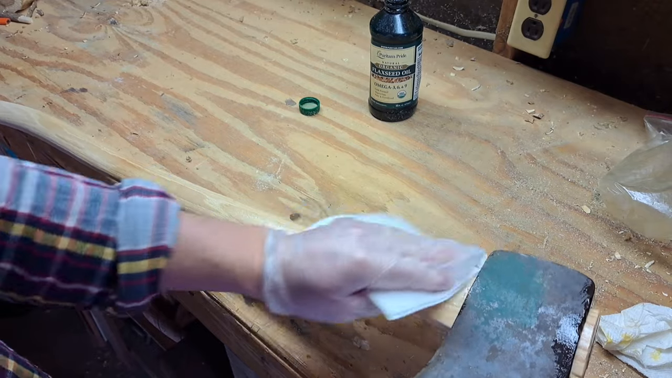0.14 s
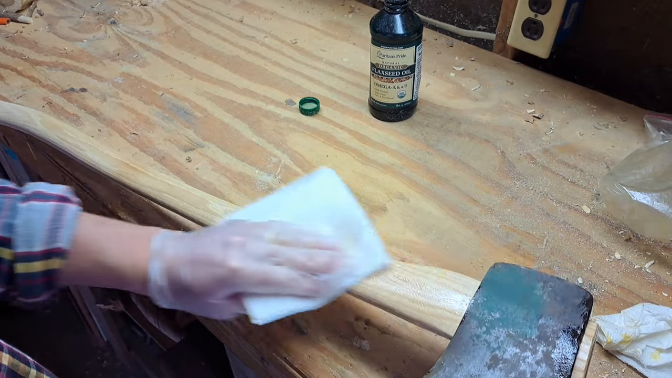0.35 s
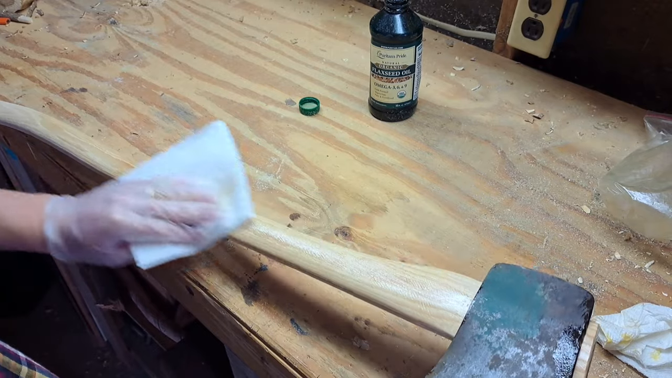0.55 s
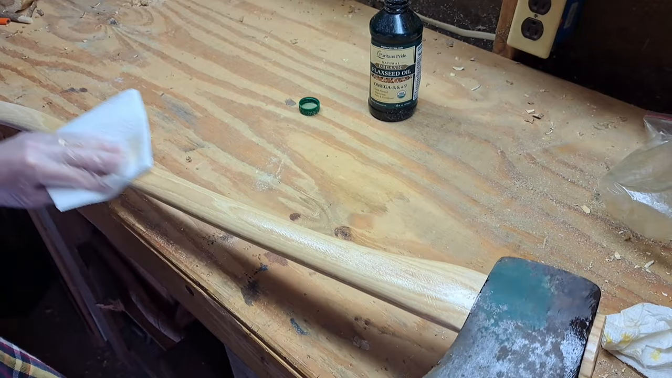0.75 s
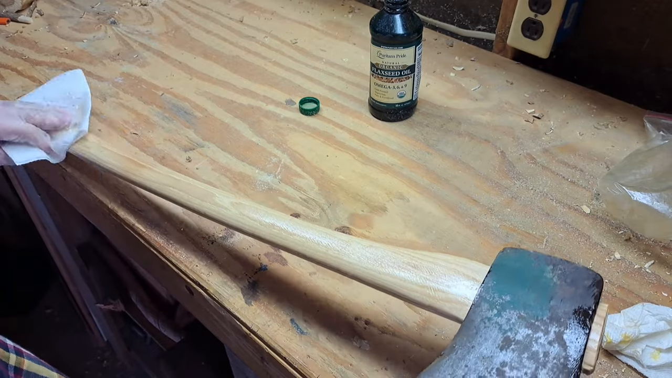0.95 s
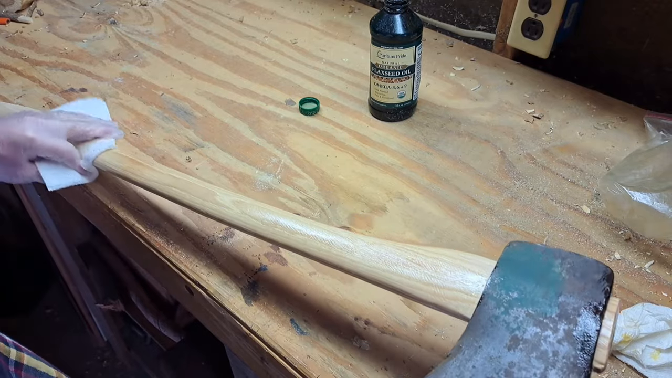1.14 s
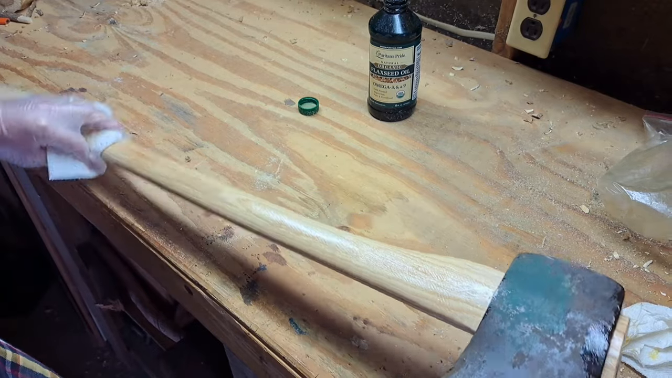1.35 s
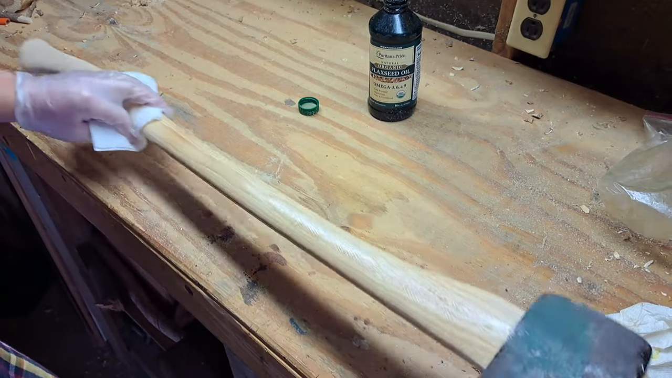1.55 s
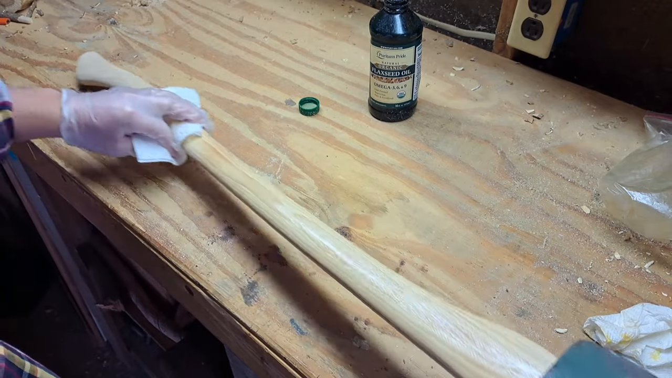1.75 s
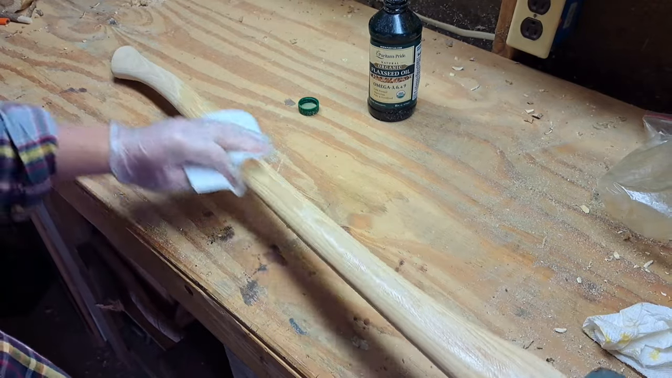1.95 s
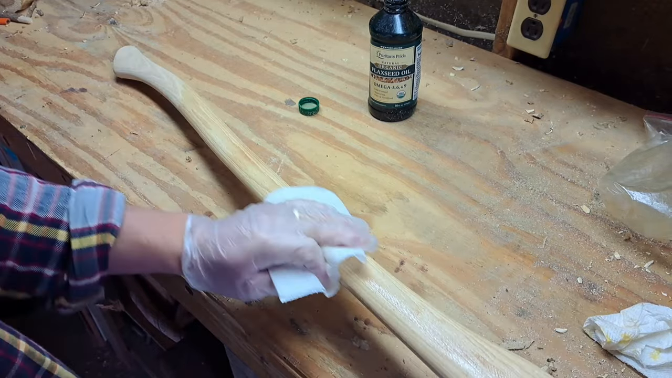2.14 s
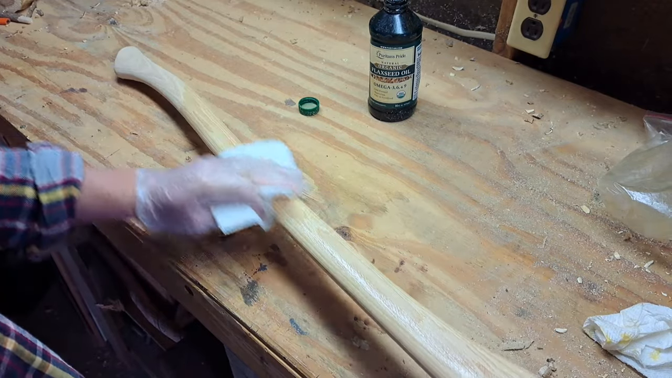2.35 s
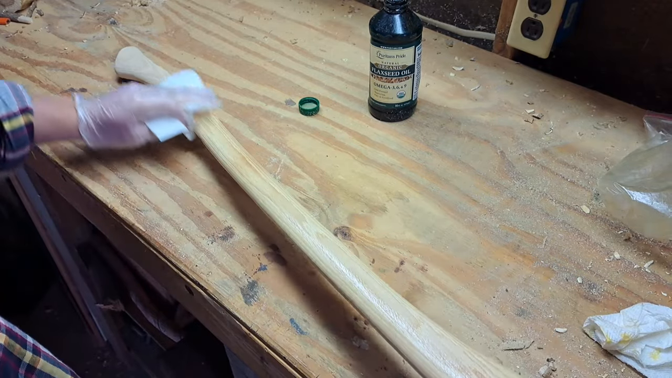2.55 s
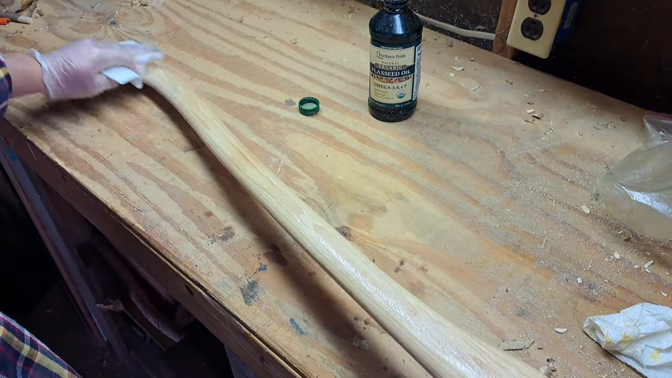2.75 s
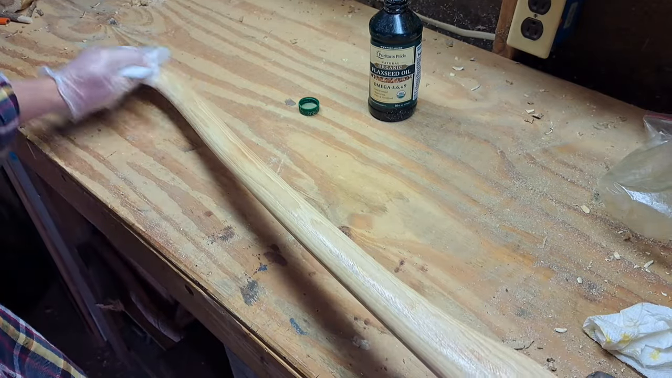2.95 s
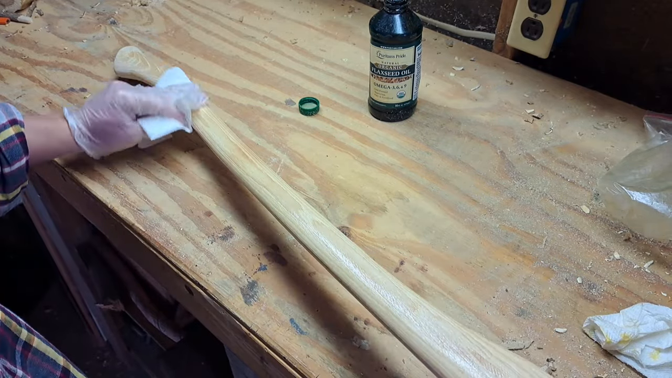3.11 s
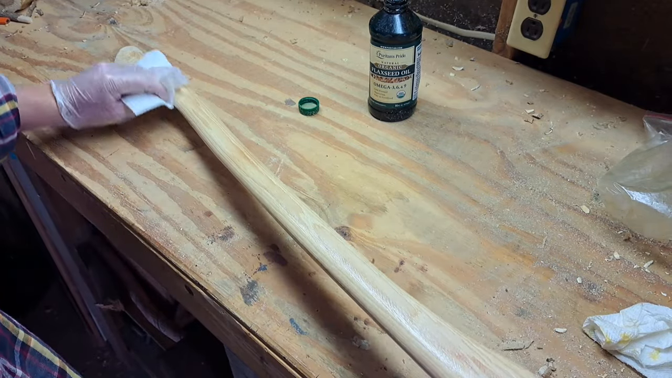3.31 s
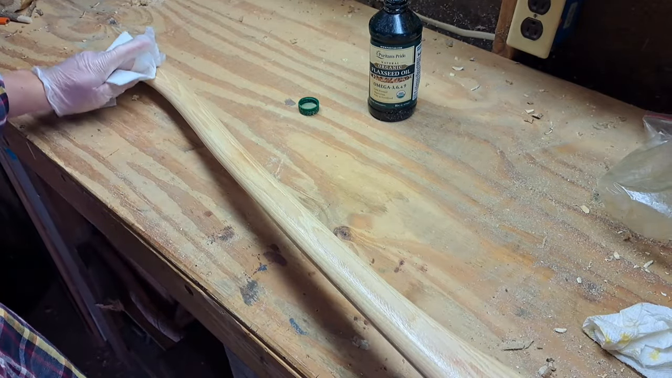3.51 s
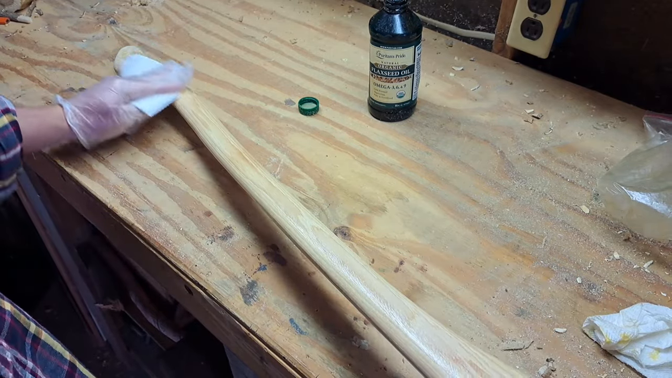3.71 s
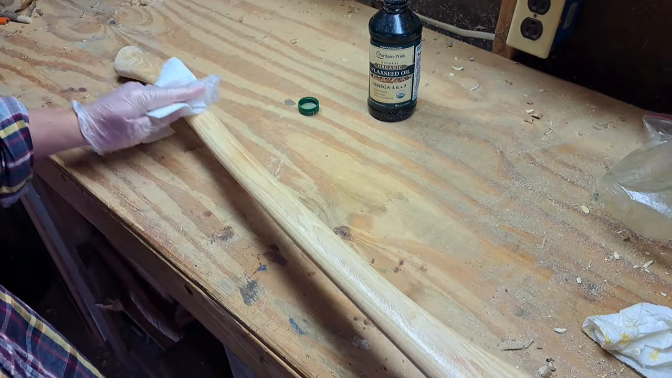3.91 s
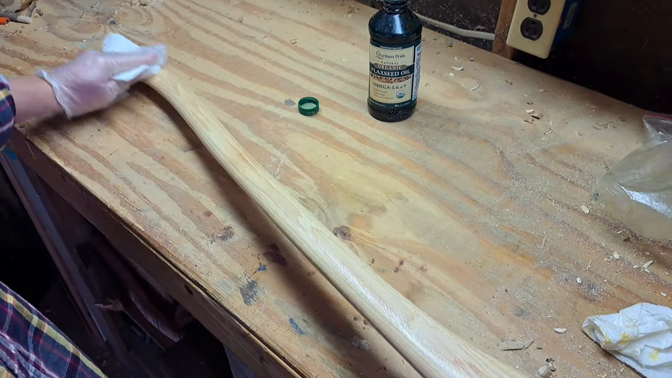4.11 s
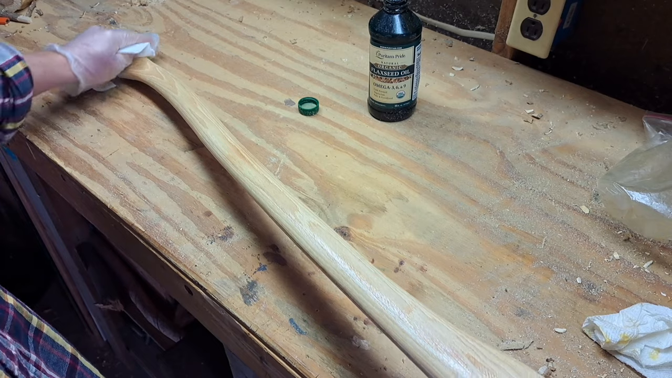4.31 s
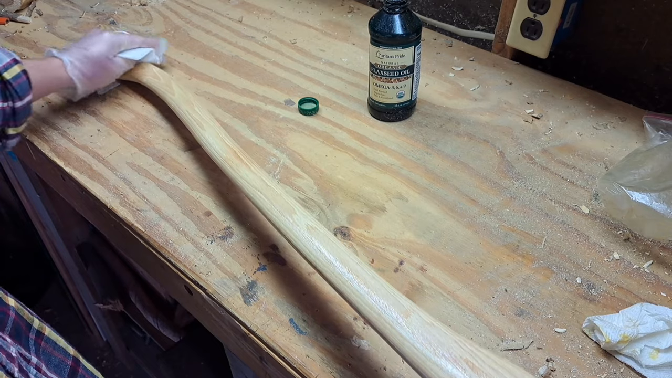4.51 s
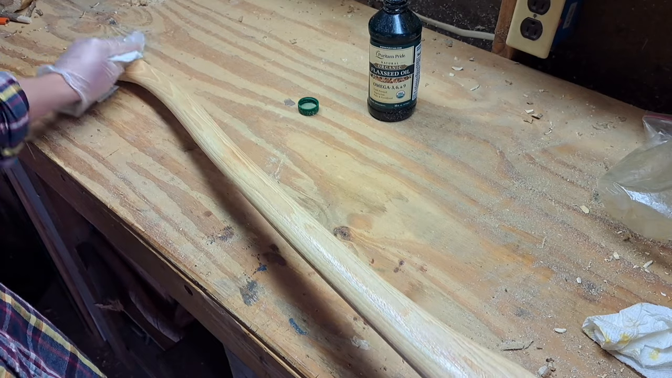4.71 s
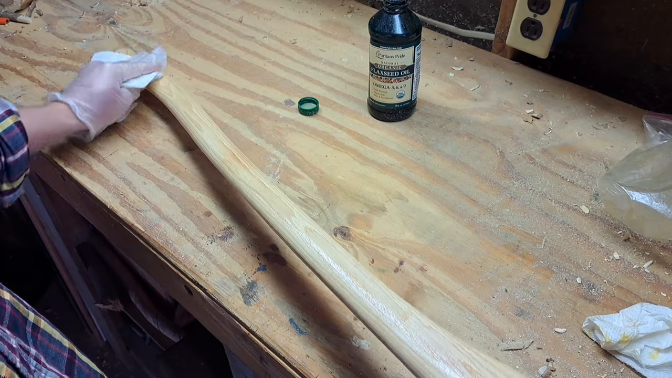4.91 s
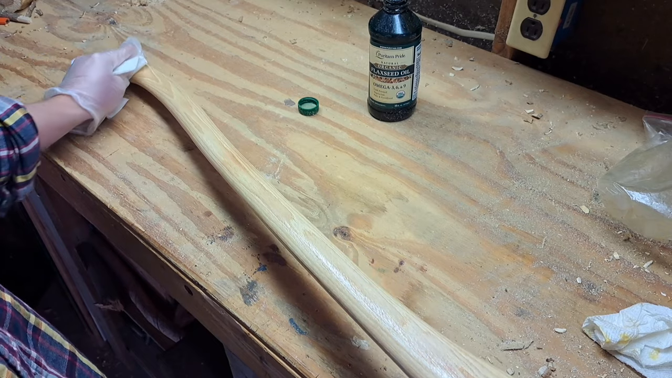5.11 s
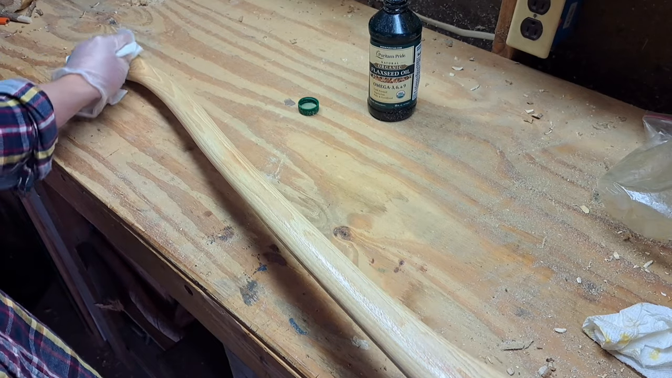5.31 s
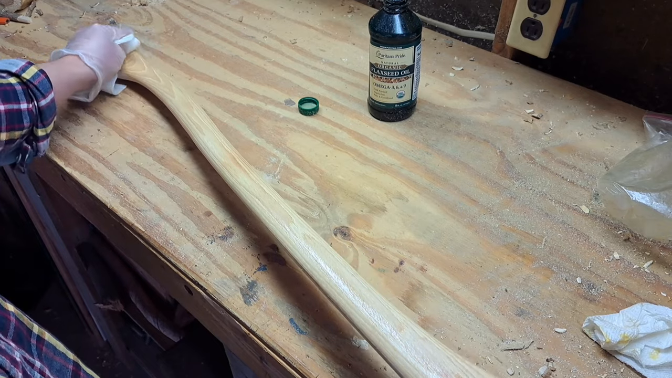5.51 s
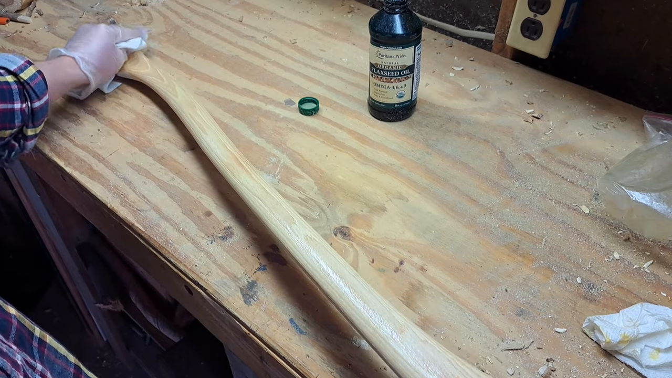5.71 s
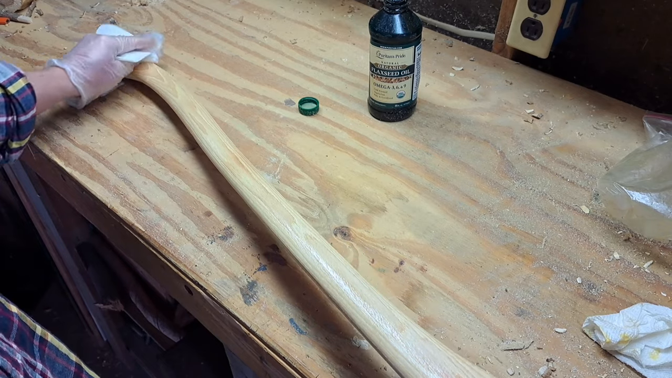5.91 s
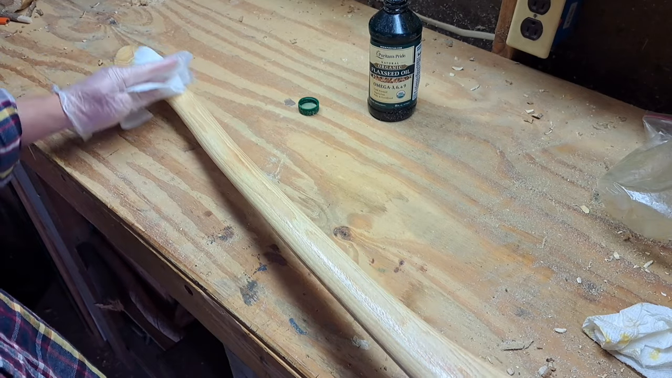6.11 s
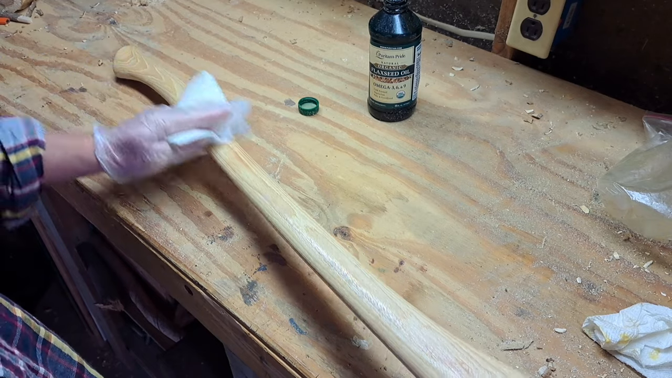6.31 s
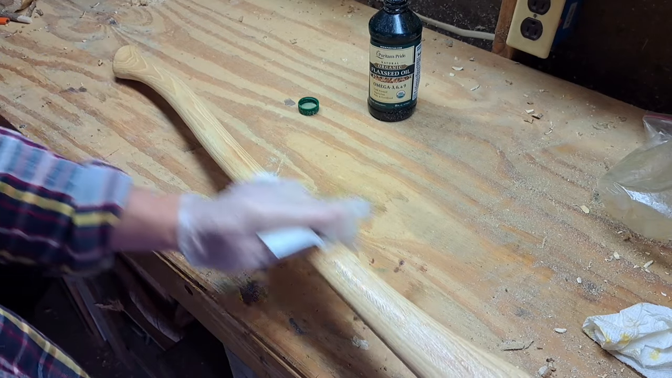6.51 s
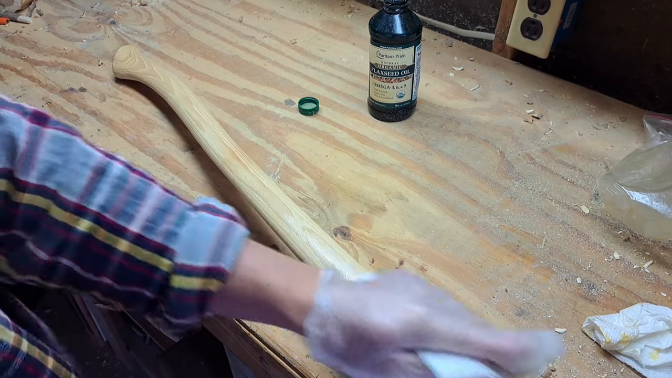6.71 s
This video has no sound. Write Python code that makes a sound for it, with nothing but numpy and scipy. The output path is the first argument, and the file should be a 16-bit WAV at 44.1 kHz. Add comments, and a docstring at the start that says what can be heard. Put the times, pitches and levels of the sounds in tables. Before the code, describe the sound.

A small, quiet workshop with a faint low room tone and a short reverberation, heard close in stereo. At 0 to 0.2 s dull soft knocks and a woody, humming drag shake the bench as a paper towel starts moving. A dry, bright papery swish runs from about 0.2 to 1.0 s, followed by a brief rub. At 1.3 s a hard little crack and gritty scrape sound as the axe head lifts, then near quiet. At 1.76 s the axe lands with a loud, low rattling thud, bouncing until about 2 s. Brisk rustling strokes follow, broad and hissy from 2.2 to 4.2 s, with a thin squeak near 3.07 s and fainter ones near 4.05 and 5.08 s. From 4.2 to 5.7 s rubs are shorter and softer, with low handle groans and a small bump at 4.6 s. Fuller swishes return from 5.8 s, the last still going at the end.

```python
"""Wiping oil along an axe handle

A gloved hand wipes oil along the wooden handle of an axe with a paper towel, on a plywood workbench in a small shop.
The paper is filtered noise and tiny random ticks that follow the hand's speed; it drags on the grain and the handle hums.
The axe rocks on the bench, its head scrapes as it is lifted, and it is set down again with a rattling thud:
these ring a shared set of bench modes. Short gliding tones make the oiled wood squeak, over quiet room noise."""
import sys
import numpy as np
from scipy import signal
from scipy.fft import rfft, irfft, next_fast_len
from scipy.io import wavfile
from scipy.ndimage import uniform_filter1d

SR = 44100
rng = np.random.default_rng(int(sys.argv[2]) if len(sys.argv) > 2 else 0)


def master(y):
    """Save y as 16-bit WAV."""
    cut = np.clip(np.atleast_2d(y).T, -1, 1)
    pcm = np.round(cut * 32767)  # scale
    wavfile.write(sys.argv[1], SR, pcm.astype(np.int16))


N = 297675
T = np.arange(N) / SR

# strokes of the towel; they overlap where the hand changes its grip on the way:
# (start_s, length_s, fastest_at as a share of the length, swell: low is even and high is peaked,
#  fibre_hiss_db, fold_rustle_db, pad_rub_db, grain_drag_db)
STROKES = [ (-.04, 0.15, 0.49, 0.84, -52.5, -51, -59, -46),
           (0.106, 0.18, 0.39, 0.66, -54, -53, -57.5, -56.5),
           (0.195, 0.24, 0.26, 0.25, -55, -60.5, -72, -77), (0.359, 0.65, 0.8, 0.32, -53, -59, -72.5, -84),
           (0.497, 0.17, 0.35, 0.65, -59, -77, -70, -74), (1.024, 0.19, 0.85, 0.49, -51, -53, -65.5, -87),
           (1.19, 0.27, 0.091, 0.66, -69, -66.5, -69, -89), (1.314, 0.046, .7, 1.2, -56.5, -55, -72, -78),
           (1.756, 0.18, 0.28, 0.61, -63, -52.5, -51, -75),
           (1.794, 0.44, 0.63, 0.67, -50, -53.5, -63, -65.5),
           (1.876, 0.098, 0.73, 0.81, -62, -69, -52.5, -49),
           (2.227, 0.37, 0.66, 0.34, -49.5, -55, -60.5, -74), (2.478, 0.22, 0.51, 0.55, -54, -70, -57, -51),
           (2.556, 0.29, 0.54, 0.84, -48, -53, -55, -55), (2.871, 0.33, 0.42, 0.85, -48.5, -55, -59, -60.5),
           (3.161, 0.42, 0.62, 0.59, -53.5, -58, -65, -68.5),
           (3.295, 0.14, 0.5, 0.81, -69, -69, -60, -62.5), (3.468, 0.11, 0.3, 0.88, -58, -62, -69, -57),
           (3.577, 0.32, 0.44, 0.6, -52, -56.5, -61.5, -65), (3.895, 0.15, 0.7, 0.35, -55.5, -62, -79, -80),
           (3.968, 0.37, 0.35, 0.93, -49, -53.5, -59.5, -62.5),
           (4.219, 0.26, 0.35, 0.43, -59, -61, -62.5, -62.5),
           (4.405, 0.19, 0.26, 0.55, -59, -58, -59.5, -62),
           (4.547, 0.16, 0.5, 0.32, -58, -57.5, -60.5, -66),
           (4.702, 0.26, 0.39, 0.25, -54.5, -59.5, -64.5, -73),
           (4.97, 0.19, 0.35, 0.7, -55, -59, -63.5, -83), (5.09, 0.53, 0.41, 0.42, -63, -61, -68.5, -76.5),
           (5.585, 0.14, 0.48, 0.74, -72, -65.5, -63, -68.5),
           (5.657, 0.16, 0.62, 0.2, -72, -72, -74.5, -79),
           (5.795, 0.37, 0.28, 0.37, -54.5, -56.5, -63.5, -68),
           (6.001, 0.36, 0.5, 0.51, -52.5, -63, -68, -68),
           (6.27, 0.91, 0.27, 0.45, -49.5, -53.5, -60.5, -69.5)]
# where the hand is: (time_s, reach: 0 at the head to 1 at the knob)
HAND_REACH = [(0, 0.092), (.3, 0.081), (.75, 0.67), (1.05, 1), (1.75, 0.98), (2.25, 0.36), (2.85, 0.97),
              (3.25, 0.7), (3.55, 1), (3.9, 0.9), (4.3, 0.94), (6, 0.94), (6.75, 0.18)]
# spectrum of a hard, gritty contact: (frequency_hz, level_db)
CRACK_SPECTRUM = [(300, -22), (700, 5), (1300, 4), (2200, -10.5), (5500, -11.5), (9000, -25), (15000, -29)]
GRIP_SHIFT = .08  # how far a new grip moves the resonances, on a natural-log scale


def undb(db):
    """Turn decibels into gain."""
    return 10 ** (np.asarray(db) / 20)


def unit(x):
    """Scale a sound to an rms of 1."""
    return x / np.sqrt(np.mean(x ** 2))


def curves(rows):
    """Read each column of a time table at every sample."""
    seconds, *columns = np.transpose(rows)
    return [np.interp(T, seconds, column) for column in columns]


def shape(x, gain):
    """Filter a sound by a gain that is a function of frequency."""
    size = next_fast_len(x.shape[-1] + 8192)
    hz = np.maximum(np.arange(size // 2 + 1) * SR / size, 1)
    return irfft(rfft(x, size) * gain(hz), size)[..., :x.shape[-1]]


def along(points, hz):
    """Read (frequency_hz, value) points on a logarithmic frequency axis."""
    point_hz, value = np.transpose(points)
    return np.interp(np.log(hz), np.log(point_hz), value)


def colour(x, points):
    """Filter a sound by (frequency_hz, level_db) points."""
    return shape(x, lambda hz: undb(along(points, hz)))


def ports(pair):
    """Mix two unrelated signals into left and right microphone ports: alike in the bass, unrelated in the treble."""
    # how alike the ports are: (frequency_hz, likeness 0-1)
    port_likeness = [(100, 0.86), (300, 0.92), (640, 0.65), (1400, 0.3), (3000, 0.13), (15000, 0.13)]
    mid = shape(pair[0], lambda hz: np.sqrt(1 + np.clip(along(port_likeness, hz), 0, .99)))
    side = shape(pair[1], lambda hz: np.sqrt(1 - np.clip(along(port_likeness, hz), 0, .99)))
    return np.array([mid + side, mid - side])


def noise(size=N):
    """Make white noise at the two ports."""
    return ports(rng.standard_normal((2, size)))


def walk(rate):
    """Random levels, rate of them per second, joined by slopes; spread near 1."""
    hold = max(int(SR / rate), 1)
    steps = np.repeat(rng.standard_normal(N // hold + 1), hold)
    return unit(uniform_filter1d(steps, hold)[:N])


def ring(x, response):
    """Pass a sound through a left and right impulse response."""
    return signal.fftconvolve(np.atleast_2d(x), response, axes=-1)[:, :N]


def fade(t, t60):
    """Die away exponentially, by 60 dB in t60 seconds."""
    return np.exp(-np.log(1000) * t / t60)


def resonance(x, hz, width_hz):
    """Ring a resonance whose centre may glide; a larger width is broader."""
    turn = np.exp(2j * np.pi * np.cumsum(hz * np.ones(N)) / SR)
    pole = np.exp(-2 * np.pi * width_hz / SR)
    # shift the centre down to 0 Hz, filter there, and shift back
    rung = signal.lfilter([1], [1, -2 * pole, pole ** 2], x / turn) * turn
    return unit(rung.real)


def slips(rate, spread_db):
    """Make tiny random slips, about rate per second: many weak, a few strong."""
    size = undb(spread_db * np.minimum(rng.exponential(size=N), 5))
    return (rng.random(N) < rate / SR) * size * rng.choice([-1, 1], N)


def friction(spectrum, rate, spread_db, smooth, flutter_db):
    """Catching fibres tick over a smooth rush; the contact flutters as the paper shifts."""
    # each tick is smeared over a few milliseconds without gaining a colour
    scatter = rfft(rng.standard_normal((2, 256)) * fade(T[:256], 0.00408))
    smear = irfft(scatter / np.abs(scatter))
    ticks = ring([slips(rate, spread_db), slips(rate, spread_db)], smear)
    rush = ports(unit(ticks) + smooth * rng.standard_normal((2, N)))
    return unit(colour(rush, spectrum) * undb(flutter_db * walk(70)))


def through_wood(rub, bench, ring_db):
    """Rubbing is heard directly and as the ring of the wood."""
    return unit(rub + undb(ring_db) * unit(ring(rub[0], bench)))


def near_walls(x, wet_db, t60):
    """Shelves and walls close by add a short, faint tail."""
    tail = noise(SR // 2) * fade(T[:SR // 2], t60)
    return x + undb(wet_db) * ring(x, tail / np.sqrt(np.sum(tail ** 2) / 2))


def grips(spread):
    """Each stroke takes a new grip: a factor near 1 that slides from one stroke's value to the next."""
    starts = np.sort(np.array(STROKES)[:, 0])
    return np.exp(spread * np.interp(T, starts, rng.uniform(-1.5, 1.5, len(starts))))


def bench_response():
    """One tap's echo: modes of axe and bench, quick clatter of the boards, and the shop's reverberation."""
    # modes of the axe and bench in contact, before the room or hand damps them: (frequency_hz, level_db, t60_s)
    bench_modes = [(60, -4, .5), (82, -3, .5), (123, 4, .55), (143, 0, .4), (165, -3, .5), (196, 0, .35),
                   (215, -2, .3), (269, -3, .5), (286, -5, .3), (324, 4.5, .3), (342, 2, .18),
                   (361, -2, .3), (406, 1, .45), (428, 3.5, .24), (468, 2, .4), (517, -4, .4),
                   (552, -1, .35), (582, -4, .3), (625, -5, .28), (665, -4, .33), (720, -6, .24),
                   (825, 0, .25), (852, 1, .35), (1025, -3, .33), (1221, 4, .24), (1325, -2, .35),
                   (1432, -8, .3), (1570, -2, .22), (1690, -5, .45), (1850, -2, .22), (2255, 2, .26),
                   (3015, -5, .45), (3240, 1, .22), (3730, 0, .25), (5600, 1, .3), (6600, 2, .25)]
    t = T[:SR]
    modes = 0
    for hz, db, t60 in bench_modes:
        # short waves reach the two ports with unrelated phases
        phase = rng.standard_normal((2, 1)) * min(hz / 900, 2)
        modes = modes + undb(db) * np.sin(2 * np.pi * hz * t + phase) * fade(t, t60)
    boards = shape(noise(SR), lambda hz: (hz + 500) / (hz + 1300)) * fade(t, .085)
    reverb = noise(SR)
    low = shape(reverb, lambda hz: 1 / (1 + (hz / 900) ** 2))
    high = reverb - low
    # the reverberation builds up, and its treble dies first
    room = (low * fade(t, .52) + high * fade(t, .38)) * (1 - fade(t, .06))
    return modes * (1 - fade(t, .015)) + undb(21) * boards + undb(9) * room


def shop_air():
    """The still air of the shop is a coloured noise whose level wavers slightly."""
    # (frequency_hz, level_db)
    air_spectrum = [(20, -16), (55, 5.5), (90, -1), (150, -1), (350, -14), (900, -25.5), (1700, -16),
                    (3500, -29.5), (5300, -51.5), (8500, -36), (13000, -50.5), (16000, -50)]
    level_db = -70 + 0.94 * walk(22.0)
    return unit(colour(noise(), air_spectrum)) * undb(level_db)


def stroke_levels():
    """In each stroke the hand speeds up and slows to a stop; hiss, rustle, pad and drag follow its speed."""
    # each sound grows as this power of the speed: hiss, rustle, pad, drag
    powers = np.array([[1.68], [1], [1.46], [1.54]])
    smoothing_s = 0.009
    energy = np.zeros((len(powers), N))
    for start, length, fastest, swell, *levels_db in STROKES:
        moving = (T > start) & (T < start + length)
        share = (T[moving] - start) / length
        progress = np.interp(share, [0, np.clip(fastest, .02, .98), 1], [0, .5, 1])
        speed = np.sin(np.pi * progress) ** abs(swell)
        energy[:, moving] += (undb(levels_db)[:, None] * speed ** powers) ** 2
    return np.sqrt(np.abs(uniform_filter1d(energy, max(int(smoothing_s * SR), 1))))


def fibre_hiss():
    """Fine paper fibres catch so often that their ticks merge into a bright hiss."""
    # (frequency_hz, level_db)
    fibre_spectrum = [(3000, -19), (6000, -5), (8500, -11), (10500, -6), (13300, -1), (15000, -4.5),
                      (16000, -7)]
    return friction(fibre_spectrum, rate=3000, spread_db=0.0, smooth=2.1, flutter_db=0.67)


def folds():
    """The folds rustle; a stiff crease colours the sound and drifts as the towel bunches up."""
    # (frequency_hz, level_db)
    rustle_spectrum = [(300, -27), (1100, -31), (1800, -7.5), (2300, -2), (3300, -2), (4200, -2.5),
                       (5200, -5.5), (6300, -6), (8500, -14), (12000, -21.5)]
    rub = friction(rustle_spectrum, rate=900, spread_db=2.5, smooth=1.2, flutter_db=1.1)
    crease_hz = 5150 * (1 + .055 * walk(6))
    crease = resonance(rub, crease_hz, width_hz=800)
    crease_db = -7.5 + 2 * walk(3.32)
    return unit(rub + undb(crease_db) * crease)


def hollow_pad(bench):
    """The cupped paper rings in broad hollows that tighten toward the knob and shift with every grip."""
    # spectrum of the rubbing pad: (frequency_hz, level_db)
    pad_spectrum = [(600, -19.5), (1080, -7.5), (1320, -4.5), (1640, -1.5), (2100, -5.5), (3200, -7),
                    (6000, -55)]
    # hollows of the cupped paper, before the grip shifts them: (head_hz, knob_hz, width_hz, level_db)
    paper_hollows = [(1090, 1330, 210, -3), (1600, 1760, 260, 0)]
    rub = friction(pad_spectrum, rate=320, spread_db=2, smooth=0.82, flutter_db=0.0)
    reach, grip = curves(HAND_REACH)[0], grips(GRIP_SHIFT)
    hollows = 0
    for head_hz, knob_hz, width_hz, db in paper_hollows:
        centre_hz = (head_hz + (knob_hz - head_hz) * reach) * grip
        hollows = hollows + undb(db) * resonance(rub, centre_hz, width_hz)
    return unit(through_wood(rub, bench, ring_db=-6) + undb(-3) * unit(hollows))


def grain_drag(bench):
    """A firm grip catches on the grain and rings the bench; the cupped paper adds a hollow near 840 Hz that
    shifts with every grip."""
    # (frequency_hz, level_db)
    grain_spectrum = [(60, -16), (140, -1), (200, -3), (330, -3), (450, 1.5), (650, -.5), (820, 1),
                      (1050, 2), (1500, -5), (2100, -12), (3000, -13), (6000, -60)]
    rub = friction(grain_spectrum, rate=550, spread_db=1.5, smooth=0.9, flutter_db=2.5)
    note = resonance(rub, 840 * grips(GRIP_SHIFT), width_hz=130)
    return unit(through_wood(rub, bench, ring_db=-11) + undb(-8) * note)


def patchy(x):
    """Crumpled paper keeps changing shape, so third-octave bands swell and sink on their own."""
    centres_hz = 500 * 2 ** (np.arange(13) / 3)
    size = next_fast_len(N)
    spectrum, hz = rfft(x, size), np.arange(size // 2 + 1) * SR / size
    out = np.zeros_like(x)
    for k, band in enumerate(np.eye(len(centres_hz))):
        waver_db = 1.4 * walk(16) * (k < len(centres_hz) - 1)  # the highest hiss stays even
        band_sound = irfft(spectrum * np.interp(hz, centres_hz, band), size)[:, :N]
        out += band_sound * undb(waver_db)
    return out


def bench_echo(x, lag_s, travel_s, gain):
    """The bench top mirrors the towel; the path changes with the hand, so the colour glides."""
    lag = lag_s + travel_s * curves(HAND_REACH)[0]
    return x + gain * np.interp(T - lag, T, x)


def handle_hum(bench, drag_gain):
    """Paper that sticks sets the handle's wavering bending note humming in bouts, and shakes the bench under it."""
    # bouts of sticking, mostly as the hand slows at the knob: (loudest_s, half_length_s, note_db, shudder_db)
    sticking_bouts = [(.026, 0.065, -44.5, -39.5), (0.098, 0.018, -37, -41.5), (0.166, 0.015, -37.5, -59),
                      (0.205, 0.039, -49, -59), (1.278, 0.086, -65, -69.5), (2.532, 0.054, -78, -59.5),
                      (2.68, 0.12, -77, -62.5), (2.873, 0.14, -59.5, -63.5), (3.04, 0.089, -71, -57),
                      (3.245, 0.073, -62.5, -81), (3.39, 0.032, -57.5, -74), (3.47, 0.05, -60, -66.5),
                      (3.656, 0.064, -58.5, -69), (3.806, 0.063, -61, -83), (3.976, 0.043, -62.5, -87),
                      (4.144, 0.13, -55.5, -63), (4.293, 0.036, -52, -56), (4.403, 0.044, -49, -56.5),
                      (4.565, 0.035, -47, -50.5), (4.69, 0.065, -49, -58), (4.79, 0.027, -59.5, -62),
                      (4.892, 0.044, -58, -68), (5.031, 0.064, -52.5, -65.5), (5.226, 0.076, -68.5, -62.5),
                      (5.305, 0.055, -66, -65.5), (5.404, 0.066, -59.5, -64), (5.532, 0.039, -58.5, -64.5),
                      (5.659, 0.061, -57, -58), (5.815, 0.045, -61, -69.5), (5.935, 0.077, -65, -65.5),
                      (6.083, 0.046, -63, -64.5), (6.26, 0.032, -63, -74), (6.736, 0.11, -61.5, -75)]
    # the bending note changes with where the handle is held and supported: (time_s, pitch_hz before wavering)
    bending_note = [(0, 185), (.04, 202), (.09, 192), (.16, 152), (.26, 142), (1.3, 124), (2.1, 140),
                    (2.5, 208), (2.9, 213), (3.4, 204), (3.7, 212), (4.3, 219), (4.42, 208), (5.05, 218),
                    (5.9, 206), (6.75, 212)]
    # the shudder that passes into the bench: (frequency_hz, level_db)
    shudder_spectrum = [(40, -17), (65, -5), (95, -23), (140, -0.5), (190, -1.5), (260, 5.5), (320, -0.5),
                        (410, -4), (520, -4), (700, -9.5), (1500, -56)]
    loudest_s, half_s, note_db, shudder_db = np.transpose(sticking_bouts)[:, :, None]
    bouts = np.exp(-2 * np.minimum(((T - loudest_s) / half_s) ** 2, 20))
    # between bouts, the drag alone keeps a faint hum going
    faint_gain = undb(-8) * drag_gain
    note_gain = np.sqrt(np.sum(bouts * undb(note_db) ** 2, axis=0) + faint_gain ** 2)
    shudder_gain = np.sqrt(np.sum(bouts * undb(shudder_db) ** 2, axis=0))
    hz = curves(bending_note)[0] * (1 + .03 * walk(110))
    steady = unit(np.sin(2 * np.pi * np.cumsum(hz) / SR))
    rough = resonance(rng.standard_normal(N), hz, width_hz=22)
    note = unit(steady + .8 * rough)
    shaken = ring(slips(rate=140, spread_db=2), bench)
    shudder = unit(colour(shaken, shudder_spectrum))
    return note * note_gain + shudder * shudder_gain


def towel(bench):
    """Fine fibres hiss, the folds rustle, the pad rubs, and a firm grip drags on the grain and rings the wood."""
    hiss_gain, rustle_gain, pad_gain, drag_gain = stroke_levels()
    # the paper stirs even in a still hand, so hiss and rustle never stop
    hiss = fibre_hiss() * np.hypot(hiss_gain, undb(-80))
    rustle = folds() * np.hypot(rustle_gain, undb(-83.5))
    pad = hollow_pad(bench) * pad_gain
    drag = grain_drag(bench) * drag_gain
    left, right = patchy(hiss + rustle + pad)
    left = bench_echo(left, lag_s=0.0014, travel_s=-0.00063, gain=0.17)
    right = bench_echo(right, lag_s=.0032, travel_s=-0.0000007, gain=0.037)
    return np.array([left, right]) + drag + handle_hum(bench, drag_gain)


def knocks(bench):
    """The axe lands and rocks between head and handle; soft contact is dull, hard contact cracks with little bass."""
    # blows on the bench: (time_s, level_db of the first 30 ms before the crack is added, brightness_hz)
    axe_blows = [(0.024, -47, 700), (.043, -41.5, 1200), (0.08, -45.5, 300), (.094, -43, 1010),
                 (.125, -46.5, 90), (1.3379, -40.5, 2800), (1.3448, -37, 3050), (1.3548, -49, 2400),
                 (1.3632, -55, 2000), (1.396, -55, 1500), (1.762, -23.5, 700), (1.777, -31, 456),
                 (1.81, -54, 600), (1.829, -34.5, 450), (1.843, -31, 120), (1.873, -40, 800),
                 (1.9, -45, 500), (1.927, -43.5, 500), (1.948, -43, 644), (1.974, -42.5, 346),
                 (4.308, -62, 500), (4.412, -68, 400), (4.575, -47, 453), (4.62, -51, 160),
                 (5.389, -61, 250), (5.633, -56.5, 400), (6.632, -64.5, 1300)]
    # force of a blow: (frequency_hz, level_db)
    thud_spectrum = [(25, -48), (48, -20), (66, 8), (95, -4.5), (130, -0.5), (220, 5), (320, 3),
                     (450, -3.5), (620, 0), (850, -5.5), (1200, -5), (2200, -12), (5000, -20), (8500, -23),
                     (14000, -31)]
    # clatter of loose boards: (frequency_hz, level_db)
    clatter_spectrum = [(80, -21), (200, 5), (450, 4.5), (850, -4.5), (1500, -11), (3000, -15), (9000, -32)]
    out = np.zeros((2, N + SR))
    t, first = T[:SR], int(.03 * SR)
    # the hand on the handle shortens the ring of each blow
    thud = colour(bench, thud_spectrum) * fade(t, 0.45)
    thud = thud / thud[:, :first].std()
    boards = unit(colour(noise(), clatter_spectrum))
    grit = unit(colour(noise(), CRACK_SPECTRUM))
    for s, db, bright_hz in axe_blows:
        start = max(int(s * SR), 0)
        # loose boards and grit clatter anew under each blow
        span = np.arange(start, start + SR) % N
        top_hz = min(bright_hz, SR / 4)
        contact = signal.butter(1, [top_hz / 7, top_hz], "bandpass", fs=SR, output="sos")
        clatter = undb(-8) * boards[:, span] * fade(t, .16)
        blow = signal.sosfilt(contact, thud + clatter)
        # the harder the contact, the more it cracks: 5.5 dB per octave of brightness
        crack_db = -10.5 + 5.5 * np.log2(top_hz / 1000)
        crack = grit[:, span] * fade(t, 0.014) * undb(crack_db)
        out[:, start:start + SR] += undb(db) * (blow / blow[:, :first].std() + crack)
    return out[:, :N]


def scrape(bench):
    """The lifted steel head judders over the plywood in quick slips: a dry rasp and the ring of the bench."""
    # (time_s, level_db of the judder)
    scrape_levels = [(1.312, -68), (1.328, -44), (1.338, -40), (1.346, -40), (1.357, -54), (1.372, -66),
                     (1.398, -47), (1.412, -56), (1.46, -57), (1.5, -75), (1.53, -100)]
    # force of the dragging head: (frequency_hz, level_db)
    scrape_force = [(60, -22), (120, -7), (165, 1), (215, -3), (330, -4), (430, 1), (600, 2), (830, -1),
                    (1030, -6), (1230, 1), (2000, -3), (3000, -9), (6500, -20), (9000, -29), (15000, -35)]
    judder = unit(slips(rate=1200, spread_db=1)) * undb(curves(scrape_levels)[0])
    t = T[:SR]
    bench_ring = colour(bench, scrape_force) * fade(t, 0.32)
    rasp = colour(noise(SR) * fade(t, 0.015), CRACK_SPECTRUM)
    out = 0
    for response, db in [(bench_ring, -5), (rasp, -8)]:
        even = response / np.sqrt(np.sum(response ** 2) / 2)
        out = out + undb(db) * ring(judder, even)
    return out


def squeaks():
    """Paper sticks and slips almost regularly on oiled wood for a moment; the pitch glides as the grip changes."""
    # (loudest_s, half_length_s, pitch_hz at the loudest, glide in octaves per s, level_db, jitter as a share of pitch)
    paper_squeaks = [(3.068, .03, 3810, -.1, -49.5, .0045), (3.125, .03, 3805, 0, -61, .006),
                     (4.05, .065, 5520, -1.1, -63, .02), (4.97, .04, 5430, .35, -71, .02),
                     (5.082, .025, 5700, 1.0, -63, .01)]
    out = np.zeros(N)
    for s, half_s, hz, glide, db, jitter in paper_squeaks:
        since = np.clip(T - s, -.2, .2)
        pitch_hz = hz * 2 ** (glide * since) * (1 + jitter * walk(500))
        phase = 2 * np.pi * np.cumsum(pitch_hz) / SR
        swell = np.exp(-((T - s) / half_s) ** 2)
        out += np.sin(phase) * undb(db + 2 * walk(120)) * swell
    return out


def scene():
    """Towel, axe and bench over the quiet of the shop."""
    bench = bench_response()
    air = shop_air()
    wiping = near_walls(towel(bench) + squeaks(), wet_db=-8.0, t60=0.33)
    return wiping + knocks(bench) + scrape(bench) + air


def record(dry):
    """Sound reaches the right port a little later; each port has its own colour; the top is cut steeply."""
    # colour of the ports: (frequency_hz, left_minus_right_db)
    port_balance = [(60, -2.5), (400, -1.8), (800, -1.5), (1300, -4), (2400, -2.5), (4800, -6), (6500, -3),
                    (8500, 5), (13000, 8), (15500, 4)]
    port_lag_s, top_hz = .00018, 15800
    late = shape(dry, lambda hz: np.exp(-2j * np.pi * np.outer([0, port_lag_s], hz)))
    tinted = shape(late, lambda hz: undb(np.outer([1, -1], along(port_balance, hz)) / 2))
    top_cut = signal.ellip(12, .1, 70, top_hz, fs=SR, output="sos")
    return signal.sosfilt(top_cut, tinted)


dry = scene()
out = record(dry)
master(out)
```